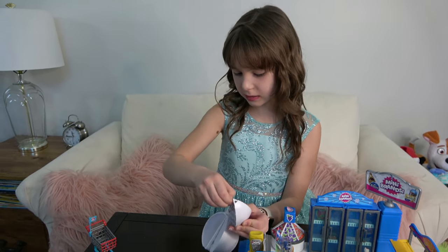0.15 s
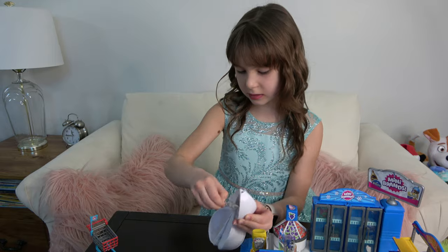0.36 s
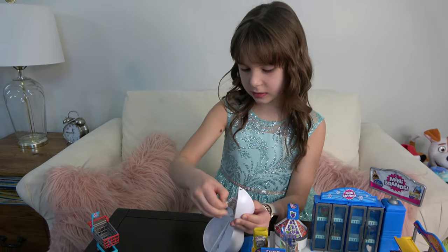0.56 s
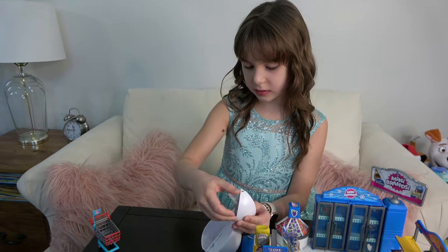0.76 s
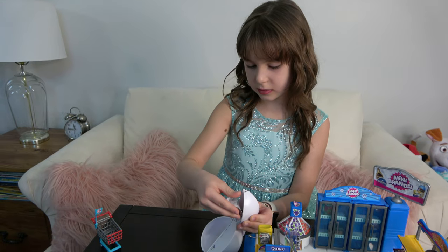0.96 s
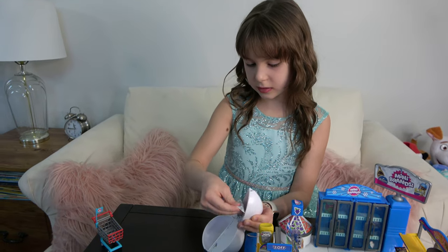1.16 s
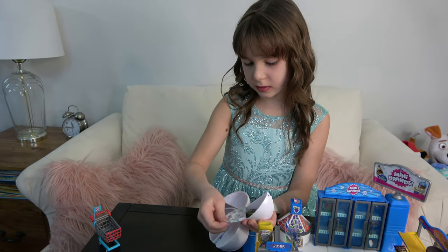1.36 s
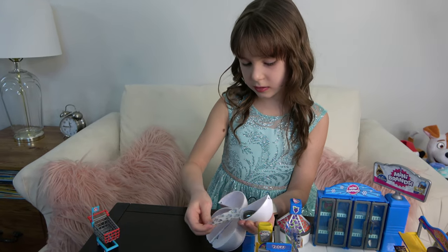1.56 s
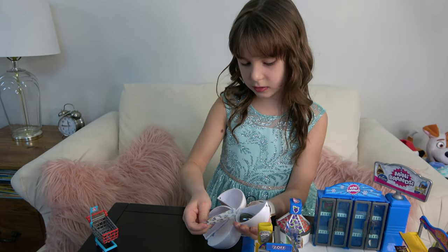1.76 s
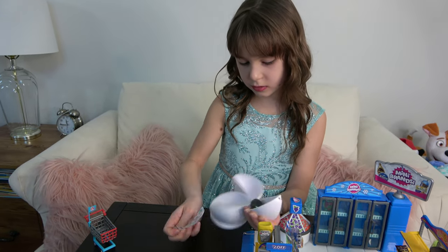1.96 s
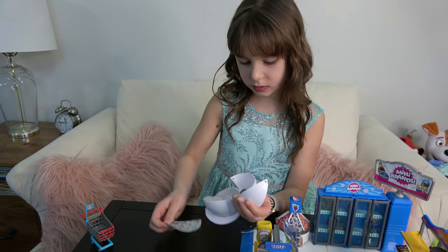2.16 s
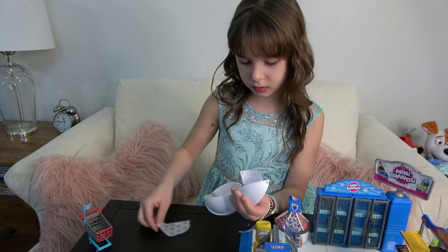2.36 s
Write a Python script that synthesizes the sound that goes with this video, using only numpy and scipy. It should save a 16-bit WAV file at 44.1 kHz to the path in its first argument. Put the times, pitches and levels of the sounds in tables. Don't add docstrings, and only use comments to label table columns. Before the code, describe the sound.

Close hard plastic shells snap open and knock together, with short scrapes, crisp wrapper crackles and soft table bumps; uneven bursts are separated by quieter fumbling, with slight room reverberation over a low steady hush.

```python
import sys
import numpy as np
from scipy import signal
from scipy.fft import rfft, irfft
from scipy.io import wavfile
from scipy.ndimage import uniform_filter1d

SR = 44100
rng = np.random.default_rng(int(sys.argv[2]) if len(sys.argv) > 2 else 0)


def wav_record(signal):
    frames = np.transpose(np.atleast_2d(signal))
    bounded = np.clip(frames, -1, 1)
    quanta = np.round(bounded * 32767).astype(np.int16)
    wavfile.write(sys.argv[1], SR, quanta)


def rack_gain(trim_db):
    fader = np.asarray(trim_db, float)
    return 10 ** (fader / 20)


N = 106766


def at_hz(points, hz):
    points_hz, values = np.array(points).T
    return np.interp(np.log(np.maximum(hz, 1)), np.log(points_hz), values)


# (frequency [Hz], level [dB])
HUSH_SPECTRUM = [(12, -1.5), (45, -1), (75, -8.5), (210, -6), (400, -9), (620, -1.5), (1290, -9.5),
                 (2460, -17.5), (5080, -17.5), (16000, -26.5)]


def floor():
    level_db, side_db = -57.5, -8
    hz = np.arange(N // 2 + 1) * SR / N
    mid_side_shape = np.array([1 + 0 * hz, hz / (hz + 40)])
    hush = irfft(rfft(rng.standard_normal((2, N))) * rack_gain(at_hz(HUSH_SPECTRUM, hz)) * mid_side_shape, N)
    return hush / hush[0].std() * rack_gain(level_db + np.array([[0], [side_db]]))


# (frequency [Hz], t60 [s])
ROOM_T60 = [(150, 1), (600, 0.33), (2000, 0.3255), (6000, 0.4649), (14000, 0.22)]
# (frequency [Hz], level [dB])
ROOM_LEVEL = [(150, -13.5), (600, -2.5), (2000, -3.5), (6000, -5.5), (14000, -7)]
# (frequency [Hz], level [dB])
ROOM_SIDE = [(60, -21), (180, -5.5), (550, -15.5), (1650, -18), (4970, -11.5), (9000, -2.5), (15000, -9)]
# (delay [s], level [dB])
ECHOES = [(.0143, -19.5), (.0161, -18), (.0201, -13.5), (.0228, -18)]


def room(near):
    gap_s, rise_s = 0.0031, 0.0042
    t = np.arange(SR // 2) / SR
    edges = 60 * 2 ** np.arange(0, 8.3, .5)
    white = rng.standard_normal((2, 2, len(t)))
    early, answer = np.zeros((2, len(t))), np.zeros((2, len(t)))
    for k, (s, db) in enumerate(ECHOES):
        early[:, int(s * SR)] = rack_gain(db) * np.array([1, .5 * (-1) ** k])
    onset = np.clip((t - gap_s) / rise_s, 0, 1)
    for k, (low, high) in enumerate(zip(edges, edges[1:])):
        hz = np.sqrt(low * high)
        t60 = at_hz(ROOM_T60, hz)
        fade = rack_gain(-60 * t / t60) * onset * np.sqrt(14 / t60 / SR)
        band_pass = signal.butter(2, [low, high], "band", fs=SR, output="sos")
        band = signal.sosfilt(band_pass, white[k % 2] * fade + early * (-1) ** k)
        answer += band * rack_gain(at_hz(ROOM_LEVEL, hz) + np.array([[0], [at_hz(ROOM_SIDE, hz)]]))
    return signal.fftconvolve(near[None], answer)[:, :N]


# (time [s], peak level [dB], pitch [Hz])
THUMPS = [(.3, -38, 102), (0.4, -35.5, 103), (0.391, -35.5, 202), (0.472, -45, 198), (1.559, -44, 196),
          (.624, -27, 271), (0.629, -41.5, 156), (.833, -34, 267), (0.842, -41.5, 132), (1.054, -37.5, 326),
          (1.079, -36.5, 255), (1.218, -42, 259), (1.969, -42.5, 119), (2.052, -31, 272), (2.09, -41, 150),
          (2.17, -44.5, 121), (.7, -44.5, 190)]


def thumps():
    trim_db, t60_s, rise_s = -1.5, 0.09, 0.003
    out, t = np.zeros(N + SR), np.arange(SR // 4) / SR
    for s, db, hz in THUMPS:
        wobble = uniform_filter1d(rng.standard_normal(len(t)), size=400) * 20
        envelope = rack_gain(db + trim_db - 60 * t / t60_s) * (1 - np.exp(-t / rise_s))
        start = int(s * SR)
        out[start:start + len(t)] += envelope * np.sin(2 * np.pi * hz * t + 0.49 * wobble)
    return out[:N]


def ring(clicks, hz, t60):
    r, w = rack_gain(-60 / (max(t60, .001) * SR)), 2 * np.pi * hz / SR
    return signal.lfilter([0, np.sin(w)], [1, -2 * r * np.cos(w), r * r], clicks + 1e-18)


def twin(clicks, hz, t60):
    t60 = min(t60, .05)
    return ring(clicks[0], hz, t60) + 0.54 * ring(clicks[1], hz * 1.03, t60 * 0.5)


def rub(modes, strokes, contacts_per_s, centre_hz):
    release_s, grain_db = 0.0037, 3.5
    t, out = np.arange(N) / SR, np.zeros(N)
    shapes = np.array([(t >= s) * np.exp(-np.maximum(t - s - d, 0) / release_s) for s, d, *_ in strokes])
    db, low_tilt, high_tilt = np.array(strokes)[:, [2, 3, -1]].T
    born = rng.random(N) < contacts_per_s / SR
    size = rack_gain(grain_db * np.minimum(rng.exponential(1, N), 4)) * born
    for hz, level_db, t60 in modes:
        tilt = high_tilt if hz > centre_hz else low_tilt
        gain = rack_gain(db + level_db + tilt * np.log2(hz / centre_hz)) @ shapes
        out += twin(gain * size * rng.standard_normal((2, N)), hz, t60)
    return out * 0.25


# (frequency [Hz], level [dB], t60 [s])
SHEET = [(1796, -13.5, 0.0034), (2700, -9, 0.0039), (3987, -2.5, 0.0031), (4880, -1, 0.0026),
         (5640, -4.5, 0.0016), (6820, 2, 0.0025), (8694, 0, 0.002), (10250, 0, 0.0012),
         (12650, -4, 0.00096)]
# (start [s], length [s], level [dB], tilt [dB per octave])
CRINKLES = [
    (0.2953, 0.075, -16, 0),
    (2.167, 0.007, -35.5, 2),
    (1.203, 0.095, -52, 0),
    (1.306, 0.1, -46, 5),
    (1.499, 0.13, -36.5, -14),
    (1.956, 0.12, -32, -6),
]


def crinkles():
    return rub(SHEET, CRINKLES, 1600, 4200)


# (frequency [Hz], level [dB], t60 [s])
SHELL = [(385, -31, 0.028), (597, -12, 0.025), (734, -20.5, 0.033), (992, -11, 0.039), (1140, -10, 0.031),
         (1374, -5.5, 0.022), (1562, -10, 0.077), (1926, -1, 0.021), (2194, -4, 0.016), (2824, -9.5, 0.014),
         (3260, -5, 0.011), (4330, -13, 0.012), (5570, -3.5, 0.0039), (7670, -11, 0.006)]
# (start [s], length [s], level [dB],
#   tilt below the centre [dB per octave], tilt above it [dB per octave])
SCRAPES = [(0.2969, 0.006, -14.5, 2, 5), (0.311, 0.064, -20.5, 5, 2), (0.337, 0.0099, -20, 6, 0.5),
           (0.475, 0.016, -28, -3, 1.5), (0.501, 0.011, -26, 0, 3.5), (0.521, 0.046, -36.5, 6, 1.5),
           (0.594, 0.076, -36.5, -2.5, 2.5), (0.774, 0.049, -46, -6, -26), (1.29, 0.036, -44.5, -3, 0),
           (1.33, 0.22, -47, 1.5, 4.5), (1.548, 0.055, -41, -4.5, 1), (1.968, 0.04, -36.5, -7, -20),
           (2.059, 0.027, -38, 6, 11.5), (2.188, 0.038, -31.5, 7, -4.5)]


def scrapes():
    return rub(SHELL, SCRAPES, 1800, 2240)


# (time [s], level [dB], frequency [Hz])
RINGS = [(.3035, -11.5, 2000), (.345, -25, 423), (.778, -33.5, 1263), (1.968, -22.5, 4100),
         (.834, -31, 651), (1.078, -34, 768), (2.178, -29.5, 411), (.3365, -11.5, 3100),
         (.339, -11.5, 1983), (.361, -14, 2080), (.468, -26, 582), (.475, -18, 1536), (.505, -17, 3225),
         (.508, -26, 1970), (1.289, -36, 2100), (1.312, -30.5, 2100), (1.3455, -35, 2020),
         (1.406, -33.5, 2350), (1.454, -16.5, 1233), (1.456, -19.5, 1930), (1.454, -20.5, 3420),
         (1.204, -35, 1950), (1.822, -32.5, 4070), (1.823, -34, 2645), (1.99, -23.5, 623),
         (2.002, -26.5, 607), (2.056, -17, 2610), (2.054, -16.5, 2255), (2.068, -23.5, 2700),
         (2.075, -24, 2390), (2.176, -16.5, 1189), (2.177, -26, 547), (2.19, -23, 1860), (2.306, -35, 600)]


def rings():
    out = np.zeros(N)
    for s, db, hz in RINGS:
        click = np.zeros(N)
        click[int(s * SR)] = rack_gain(db)
        out += ring(click, hz, .05 * (hz / 1000) ** -.5)
    return out


def strike(modes, s, db, chatter_s, centre_hz, colour):
    spread_db, grip_detune, first_touch = 1.5, .035, 0.54
    t, out = np.arange(int(.1 * SR)) / SR, np.zeros(N + SR)
    half = len(t) // 2
    lasts = np.clip(chatter_s, .0002, .02)[:, None]
    fall = np.exp(-t / lasts) - np.exp(-t / (0.11 * lasts))
    fall /= np.sqrt(np.sum(fall ** 2, axis=1, keepdims=True))
    click = np.eye(1, len(t))[[0, 0]]
    for k, (hz, level_db, t60) in enumerate(modes):
        spread = spread_db * rng.standard_normal(len(s))
        gain = rack_gain(db + level_db + colour(np.log2(hz / centre_hz)) + spread)
        for e, start in enumerate((s * SR).astype(int)):
            held_hz = hz * (1 + grip_detune * np.clip(rng.standard_normal(), -2, 2))
            push = np.zeros((2, len(t)))
            push[:, :half] = fall[e, :half] * rng.standard_normal((2, half))
            push[:, 4] += first_touch * (-1) ** k
            rung, plain = twin(push, held_hz, t60), twin(click, held_hz, t60)
            out[start:start + len(t)] += gain[e] * rung * np.linalg.norm(plain) / np.linalg.norm(rung)
    return out[:N]


# (time [s], peak level [dB], tilt [dB per octave], chatter [s])
SNAPS = [(0.167, -22, 0.5, 0.0015), (0.2985, -12, 8, 0.0022), (0.3055, -9, 1, 0.001),
         (0.3285, -11, -6, 0.001), (0.338, -8, -11, 0.0015), (0.349, -9, -6, 0.00089),
         (0.362, -10, -14, 0.001), (0.32, -9, 6, 0.0023), (0.365, -23, 8, 0.001), (0.371, -8, 16, 0.00084),
         (0.797, -38.5, 1, 0.0024), (1.248, -35, 10, 0.0015), (0.6246, -16.5, -7, 0.005),
         (0.8628, -38.5, 9, 0.0013), (0.941, -26, 5.5, 0.0022), (1.1909, -31.5, 1, 0.0035),
         (1.204, -20, 5.5, 0.0015), (1.3159, -32, 10, 0.0011), (1.4057, -23, -12.5, 0.0028),
         (1.508, -20, 0, 0.0031), (1.525, -19, 9, 0.0031), (1.5352, -16.5, 9, 0.003),
         (1.5406, -16, -1, 0.0024), (1.5536, -12, 6, 0.0023), (1.5934, -12.5, 1, 0.0034),
         (1.679, -51, -3, 0.0017), (1.8214, -10.5, 1.5, 0.0008), (1.9375, -35, 2, 0.0012),
         (1.968, -3.5, -3, 0.00098), (2.012, -15.5, -9.5, 0.0011), (2.0377, -24, -15, 0.00067),
         (2.054, -15, -2, 0.0016), (2.0594, -11, -4.5, 0.00064), (2.1717, -20.5, -10, 0.00089),
         (2.1949, -23, -7, 0.001)]


def snaps():
    s, db, tilt, chatter_s = np.transpose(SNAPS)
    return strike(SHEET, s, db - 7.5, chatter_s, 7300, lambda octaves: tilt * octaves)


# (time [s], peak level [dB], hollow low modes [dB per octave],
#   hard high modes [dB per octave], chatter [s])
KNOCKS = [(0.057, -43, 12, -10, 0.0044), (0.157, -26.5, 6.5, -3, 0.0014), (0.268, -35, -6, 7, 0.0036),
          (0.2822, -13.5, -4, -5, 0.0044), (0.466, -4.5, 0, 0, 0.0051), (0.505, -3.5, -14, -0.5, 0.0052),
          (0.5875, -13.5, 2.5, -0.5, 0.0068), (0.623, -14.5, 2.5, 2, 0.0049), (0.777, -30.5, 14, -1, 0.002),
          (0.833, -22, 15.5, -2.5, 0.0045), (0.852, -21, 1, -17, 0.0036), (1.054, -40, 19, -18, 0.0041),
          (1.077, -19.5, 10.5, -42, 0.012), (1.219, -25.5, 8, 2, 0.021), (1.288, -19, -2, -4.5, 0.0053),
          (1.322, -34, -7, 3, 0.0012), (1.332, -23, 3, -4, 0.0022), (1.345, -21, -0.5, 2.5, 0.0013),
          (1.362, -31, 13, -3, 0.004), (1.386, -27.5, 0, 3.5, 0.0023), (1.406, -25.5, -10, 2.5, 0.0015),
          (1.454, -1, -7.5, -0.8, 0.0029), (1.47, -6.5, -7, -2.5, 0.0089), (1.927, -19, 7.5, -1, 0.0041),
          (2.011, -36, -4, -8, 0.0046), (2.053, -5.5, 0, 3, 0.0039), (2.035, -17, -8, 4.5, 0.003),
          (2.074, -20.5, -8, 6.5, 0.0023), (2.1706, -8.5, 3, 0.5, 0.011), (2.207, -12, 1.5, -4, 0.0026),
          (2.306, -23.5, 6, -16, 0.0032)]


def knocks():
    trim_db, crack_db = -11.5, -10.5
    s, db, low_db, high_db, chatter_s = np.transpose(KNOCKS)

    def colour(octaves):
        return low_db * min(max(-octaves, 0), 1.3) + high_db * max(octaves - .3, 0)

    body = strike(SHELL, s, db + trim_db, chatter_s, 1650, colour)
    crack_level = db + trim_db + crack_db + 2 * high_db
    return body + strike(SHEET[2:], s, crack_level, chatter_s, 7000, lambda octaves: 0)


def scene():
    direct_side_db, pan_db = -15, -.5
    small = rings() + knocks() + snaps() + scrapes() + crinkles()
    small_body = signal.butter(4, 396, "high", fs=SR, output="sos")
    near = signal.sosfilt(small_body, small) + thumps()
    mid, side = room(near) + floor()
    treble = signal.butter(2, [5500, 11000], "band", fs=SR, output="sos")
    side = side + rack_gain(direct_side_db) * signal.sosfilt(treble, np.roll(near, 1))
    mid = mid + near
    return np.array([mid + side, mid - side]) * rack_gain(np.array([[pan_db], [-pan_db]]))


def band_limit(x):
    return signal.sosfilt(signal.butter(12, 16830, fs=SR, output="sos"), x)


def record(dry):
    ceiling = .62
    rounded = ceiling * np.tanh(dry / ceiling)
    top_cut = signal.cheby2(10, 60, 16800, fs=SR, output="sos")
    return band_limit(signal.sosfilt(top_cut, rounded))


dry = scene()
out = record(dry)
wav_record(out)
```